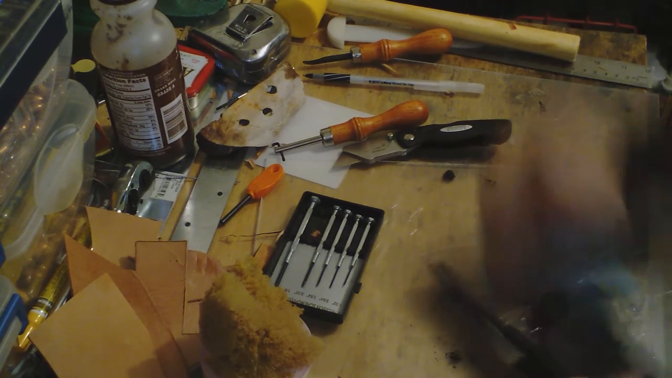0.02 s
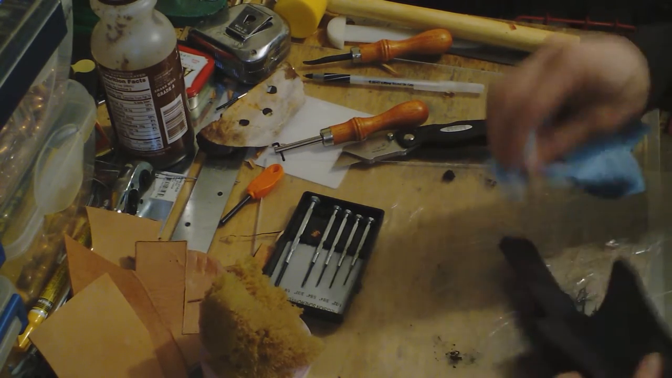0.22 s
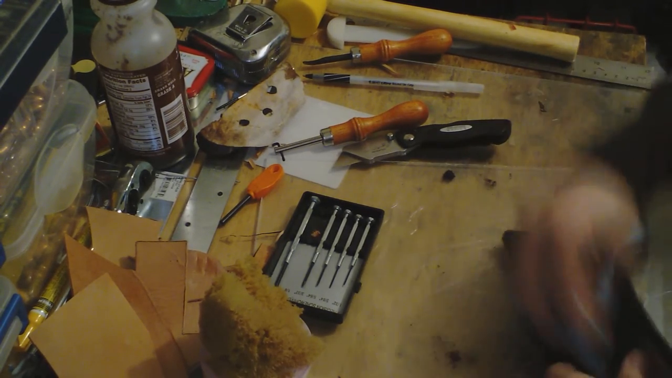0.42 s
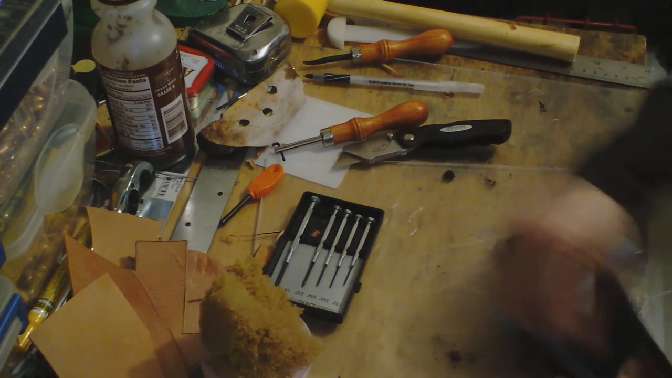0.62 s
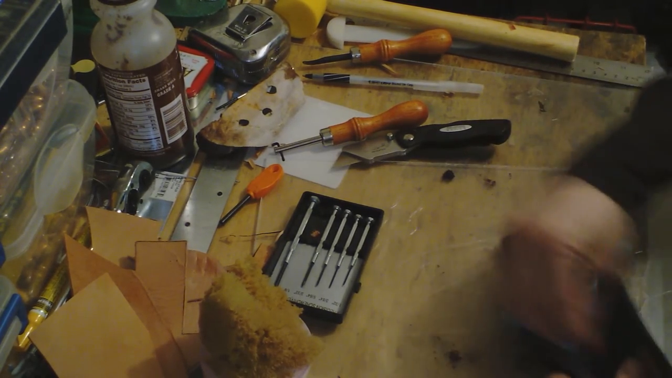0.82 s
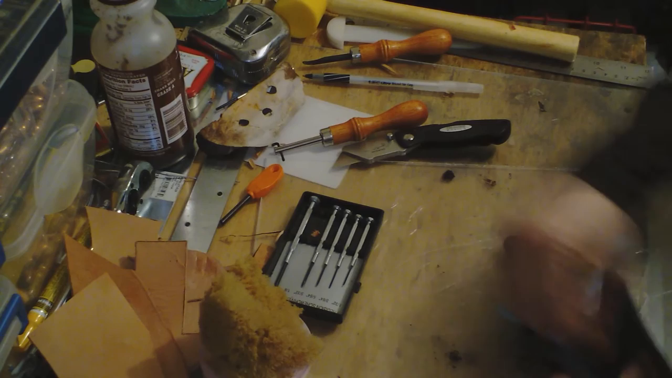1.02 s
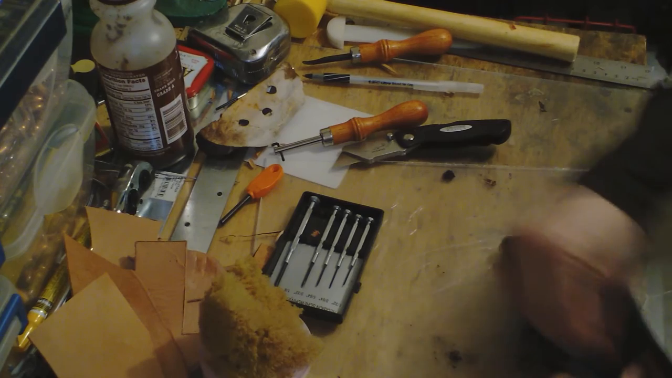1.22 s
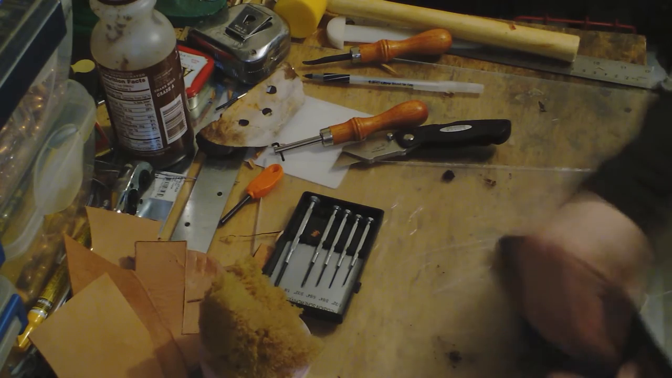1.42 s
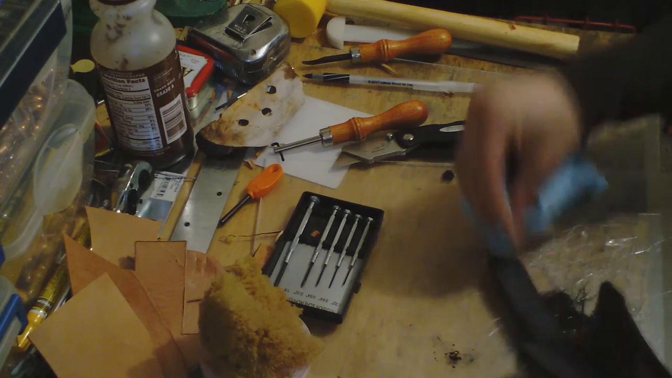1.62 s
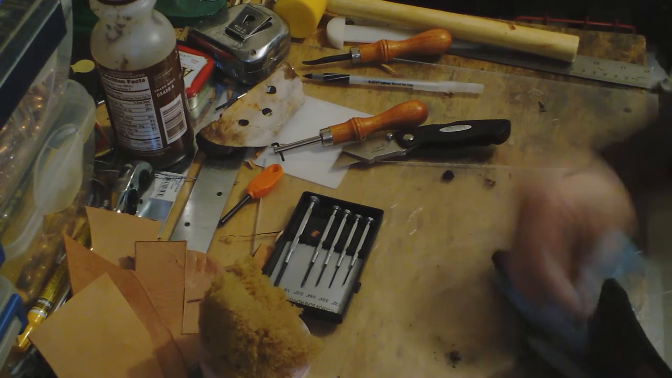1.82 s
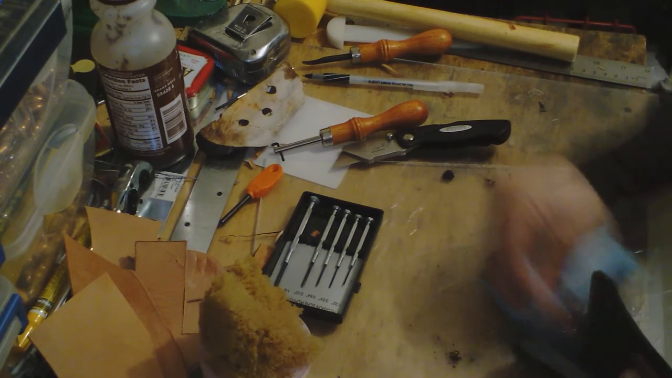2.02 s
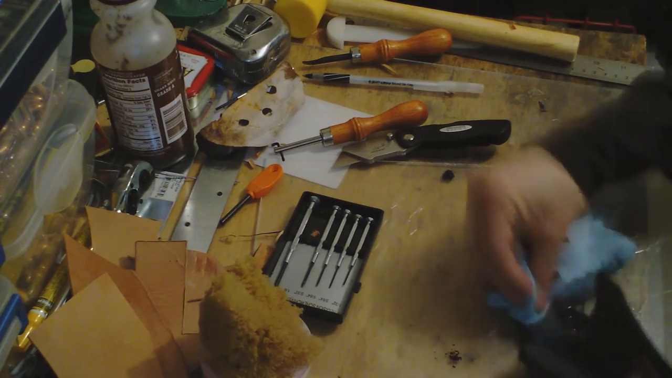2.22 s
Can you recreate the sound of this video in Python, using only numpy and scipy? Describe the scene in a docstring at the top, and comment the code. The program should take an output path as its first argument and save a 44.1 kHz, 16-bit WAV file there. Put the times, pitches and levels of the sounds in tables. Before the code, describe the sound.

A paper towel rubs leather in quick, papery, hollow strokes on a wooden bench, with small knocks

```python
"""A paper towel buffs leather on a wooden workbench; each stroke is a papery swish and a hollow rub.
A few strokes come first, with the hardest knock near their end; after a pause they return at about
ten a second, then thin out. Friction noise drives resonances; contacts excite decaying body and bench modes.
Throughout, one close microphone adds a steady, coloured hiss that dips briefly a few times."""
import sys
import numpy as np
from scipy import signal
from scipy.fft import rfft, irfft
from scipy.io import wavfile

SR = 44100
rng = np.random.default_rng(int(sys.argv[2]) if len(sys.argv) > 2 else 0)


def master(y):
    """Save y as 16-bit WAV."""
    cut = np.clip(np.atleast_2d(y).T, -1, 1)
    pcm = np.round(cut * 32767)  # scale
    wavfile.write(sys.argv[1], SR, pcm.astype(np.int16))


N = 101430
TIME = np.arange(N) / SR

# hollow resonances of the work on the bench: centre_hz, width_hz, rubbed_db, knocked_db
BODY_MODES = [(314, 96, -22, -25), (468, 35.5, -8, -22), (494.3, 43.6, -7.5, -20), (677, 48, -19.5, -27),
              (824, 60, -17, -18), (939, 79, -19, -14.5), (1104, 65, -16.5, -23.5), (1173.3, 99, 1, -0.5),
              (1450, 260, -19.5, -34), (1844, 360, -29, -17.5)]


def from_db(db):
    """Amplitude ratio: 20 dB is a factor of ten."""
    return 10 ** (np.asarray(db) / 20)


def rms_one(x):
    """Normalise the mean power, so that the rms is 1."""
    return x / np.sqrt(np.mean(x ** 2) + 1e-20)


def colour(x, spectrum):
    """Spectral shaping: weight a steady noise, in dB over log frequency, to rms 1."""
    hz, db = np.transpose(spectrum)
    bin_hz = np.maximum(np.fft.rfftfreq(N, 1 / SR), 1)
    weights = from_db(np.interp(np.log(bin_hz), np.log(hz), db))
    return rms_one(irfft(rfft(x) * weights, N))


def through(x, response):
    """Linear system: convolve the excitation with an impulse response."""
    return signal.fftconvolve(x, response)[:N]


def hollow_ring(hz, width_hz):
    """Damped resonance: the envelope swells to 1 and dies, faster for a wider resonance."""
    t = TIME[:SR // 4]
    age = np.pi * width_hz * t
    return age * np.exp(1 - age) * np.sin(2 * np.pi * hz * t)


def friction():
    """Stick-slip: paper fibres catch and let go, as dense grains over smooth sliding noise."""
    grains_per_s, grain_spread_db = 3400, 4
    smooth_share = 0.6  # of the power
    spread = np.minimum(rng.exponential(1, N), 4)
    sizes = from_db(grain_spread_db * spread) * rng.choice([-1, 1], N)
    releases = rng.random(N) < grains_per_s / SR
    grains = rms_one(sizes * releases)
    sliding = rng.standard_normal(N)
    return np.sqrt(1 - smooth_share) * grains + np.sqrt(smooth_share) * sliding


def strokes():
    """Friction-driven resonance: hand speed sets the swish, hollow rub, low scuff and bench shaking."""
    # strokes of the towel: centre_s, half_length_s, swish_db, rub_db, scuff_db
    stroke_table = [(-0.008, 0.11, -36, -32, -40.5), (0.117, 0.049, -35, -32.5, -42.5),
                    (0.203, 0.053, -35, -30.5, -41.5), (0.671, 0.16, -46.5, -47, -53.5),
                    (0.768, 0.059, -39, -40, -45), (0.863, 0.064, -39, -40.5, -43),
                    (0.973, 0.068, -42.5, -40, -52.5), (1.061, .05, -42.5, -42.5, -48),
                    (1.162, 0.047, -36, -30, -41), (1.254, 0.088, -41.5, -47.5, -48),
                    (1.305, 0.017, -55, -45, -41.5), (1.361, 0.052, -37.5, -39, -47),
                    (1.458, 0.072, -39.5, -47, -44.5), (1.554, .055, -35.5, -31, -41),
                    (1.64, 0.064, -37, -36.5, -36), (1.743, 0.07, -33.5, -31, -46),
                    (1.799, 0.028, -48.5, -29, -40), (1.88, 0.015, -63, -46.5, -51),
                    (2.028, 0.073, -71, -46, -51), (2.142, 0.066, -42, -33, -41.5),
                    (2.265, 0.062, -39.5, -32.5, -44.5)]
    # how steeply each part follows the hand speed, as exponents: swish, rub, scuff
    speed_powers = [3, 2.04, 1.88]
    # friction of the paper: frequency_hz, density_db (per Hz)
    swish_spectrum = [(100, -11), (300, -3.5), (900, -5.5), (1700, -6.5), (2400, -11.5), (3100, -2.5),
                      (3700, -13), (4500, -2.5), (5300, 0), (6300, -4), (7200, -14.5), (9000, -19),
                      (15000, -50)]
    # the bench shaking under the hand: frequency_hz, density_db (per Hz)
    shake_spectrum = [(20, -8), (48, -4.5), (80, -1.5), (120, -6), (200, -21), (400, -53)]
    shake_db = -17  # against the papery swish
    scuff_below_hz = 750

    levels = np.zeros((3, N))
    for centre_s, half_length_s, *part_db in stroke_table:
        phase = np.clip((TIME - centre_s) / half_length_s, -1, 1)
        speed = np.cos(np.pi / 2 * phase)
        levels += from_db(part_db)[:, None] * speed ** np.array(speed_powers)[:, None]

    rub, scuff = np.zeros(N), np.zeros(N)
    for hz, width_hz, rubbed_db, _ in BODY_MODES:
        ring = from_db(rubbed_db) * rms_one(through(friction(), hollow_ring(hz, width_hz)))
        if hz < scuff_below_hz:
            scuff += ring
        else:
            rub += ring

    shake = from_db(shake_db) * colour(rng.standard_normal(N), shake_spectrum)
    swish = colour(friction(), swish_spectrum) + shake
    return levels[0] * swish + levels[1] * rms_one(rub) + levels[2] * rms_one(scuff)


def knocks():
    """Impulse excitation: dull contacts ring the body, each with some decaying crack noise."""
    # knocks and taps: start_s, blow_db, crack_db (against the blow, before doubling and low-pass)
    knock_table = [(0.045, -22, -40), (.088, -24, -38), (0.177, -42, -35), (.2275, -4, -18),
                   (0.267, -30.5, -40), (0.2966, -21.5, -5), (0.319, -30, -22), (0.463, -15.5, -22),
                   (0.492, -37, -32), (0.858, -25.5, -15), (.890, -22, -5.5), (1.105, -28.5, -35),
                   (1.15, -33.5, -25), (1.230, -30.5, -35), (1.434, -28.5, -35), (1.528, -38, -32),
                   (1.55, -30, -40), (1.622, -22.5, -27), (1.675, -28.5, -35), (1.714, -20, -40),
                   (1.747, -15, -40), (1.768, -22, -30), (1.787, -26.5, -40), (2.115, -23.5, -26),
                   (2.164, -21.5, -36)]
    crack_decay_s, contact_hz = 0.011, 1650  # time constant; low-pass cutoff

    blows, cracks = np.zeros(N), np.zeros(N)
    for start_s, blow_db, crack_db in knock_table:
        blows[int(start_s * SR)] += from_db(blow_db)
        decay = (TIME >= start_s) * np.exp(-np.abs(TIME - start_s) / crack_decay_s)
        cracks += from_db(blow_db + crack_db) * decay

    body = sum(from_db(knocked_db) * hollow_ring(hz, width_hz)
               for hz, width_hz, _, knocked_db in BODY_MODES)
    soft_contact = signal.butter(4, contact_hz, fs=SR, output="sos")
    crack_noise = signal.sosfilt(soft_contact, 2 * cracks * rng.standard_normal(N))
    return through(blows, body) + crack_noise


def bumps():
    """Modal excitation: heavier contacts drive low bench modes in a mix set by where they land."""
    # bumps that shake the bench: start_s, boom_db, ring_db (before the mode level is added)
    bump_table = [(0.235, -39, -31), (.2985, -57, -34), (0.3221, -67, -42), (.468, -51, -52),
                  (0.759, -52, -50), (.897, -39, -43), (1.768, -46, -69), (2.16, -54, -48)]
    # low modes of the bench: frequency_hz, level_db, t60_s (time to fall by 60 dB)
    bench_modes = [(46.8, 1.5, 0.34), (117.1, 5.5, 0.25), (274, 4.5, 0.1), (334, 4, 0.18)]
    boom_below_hz, attack_s = 150, 0.009  # higher modes give the woody ring

    out = np.zeros(N)
    for start_s, boom_db, ring_db in bump_table:
        age = np.maximum(TIME - start_s, 0)
        swell = 1 - np.exp(-age / attack_s)
        for hz, mode_db, t60_s in bench_modes:
            blow_db = boom_db if hz < boom_below_hz else ring_db
            envelope = swell * from_db(blow_db + mode_db - 60 * age / t60_s)
            out += envelope * np.sin(2 * np.pi * hz * age)
    return out


def workshop(x):
    """Diffuse reverberation: short, dense reflections from the cluttered bench decay as noise."""
    room_db, t60_s, delay_s = -8.5, 0.07, 0.00312
    t = TIME[:SR // 2]
    tail = rng.standard_normal(len(t)) * from_db(-60 * t / t60_s) * (t > delay_s)
    unit_tail = tail / np.linalg.norm(tail)  # unit energy
    return x + from_db(room_db) * through(x, unit_tail)


def background():
    """Stationary noise: a faint floor lies under a louder coloured hiss whose gain dips briefly."""
    # steady floor: frequency_hz, density_db (per Hz)
    floor_spectrum = [(20, 15.5), (45, 11), (80, 4.5), (120, 9), (220, 5), (800, 6.5), (1200, 5),
                      (2000, 2.5), (2500, 6), (2900, 8.5), (3500, 3.5), (6500, -1.5), (9000, -4),
                      (15500, 0)]
    # microphone hiss: frequency_hz, density_db (per Hz)
    hiss_spectrum = [(200, -18.5), (500, -5), (750, -46), (1180, 5), (1600, -28), (2400, -39.5),
                     (3000, 8.5), (3900, -36.5), (4500, 0), (5000, 9.5), (5900, -5.5), (6650, 0),
                     (7300, -14.5), (8600, 0), (10000, 0), (10900, -9.5), (12050, 8), (13000, -10),
                     (14300, 6.5), (15200, -1)]
    # dips of the hiss: start_s, end_s, depth_db
    dip_table = [(.416, .468, -28), (0.917, 0.992, -13), (1.613, 1.673, -20), (1.71, 1.741, -6)]
    floor_db, hiss_db, dip_edge_s = -47.5, -42.5, 0.005

    gain = np.ones(N)
    for start_s, end_s, depth_db in dip_table:
        edge_distance_s = np.minimum(TIME - start_s, end_s - TIME)
        inside = np.clip(edge_distance_s / dip_edge_s + 0.5, 0, 1)
        gain *= 1 - inside * (1 - from_db(depth_db))

    floor = from_db(floor_db) * colour(rng.standard_normal(N), floor_spectrum)
    hiss = from_db(hiss_db) * colour(rng.standard_normal(N), hiss_spectrum)
    return floor + gain * hiss


def scene():
    """Superposition: reverberant contacts add to the background, alike in both channels."""
    contacts = strokes() + knocks() + bumps()
    mono = workshop(contacts) + background()
    return np.tile(mono, (2, 1))


def record(dry):
    """Band limitation: the microphone has a treble notch and a steep low-pass cuts the top."""
    notch_hz, notch_width_hz, cutoff_hz = 7825, 780, 15300
    b, a = signal.iirnotch(notch_hz, notch_hz / notch_width_hz, fs=SR)
    notched = signal.lfilter(b, a, dry)
    # order 12, 0.1 dB passband ripple, 90 dB stopband attenuation
    low_pass = signal.ellip(12, 0.1, 90, cutoff_hz, fs=SR, output="sos")
    return signal.sosfilt(low_pass, notched)


dry = scene()
out = record(dry)
master(out)
```